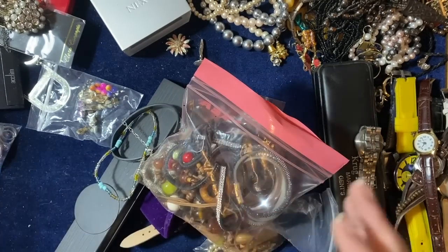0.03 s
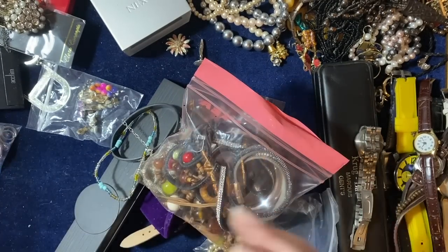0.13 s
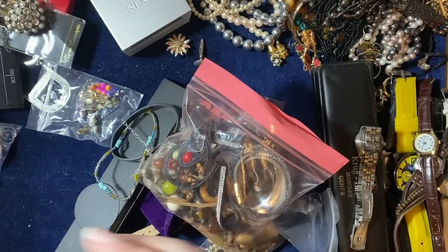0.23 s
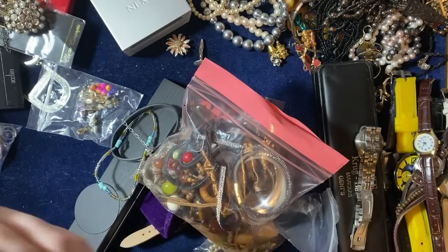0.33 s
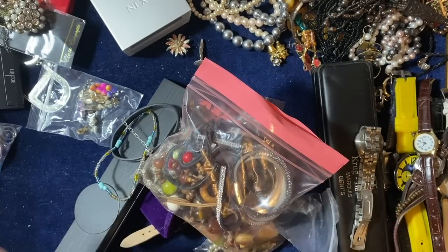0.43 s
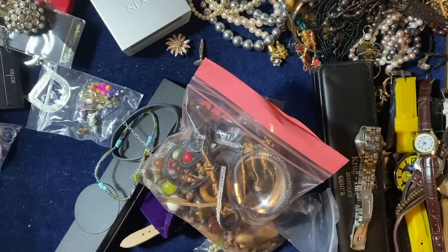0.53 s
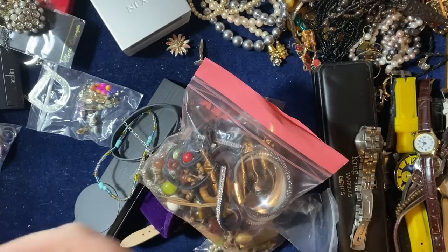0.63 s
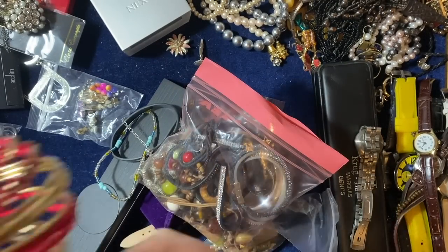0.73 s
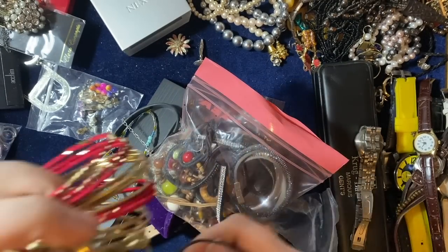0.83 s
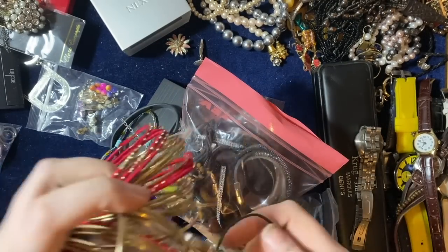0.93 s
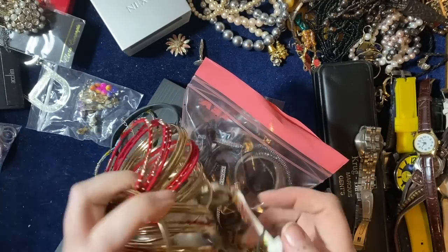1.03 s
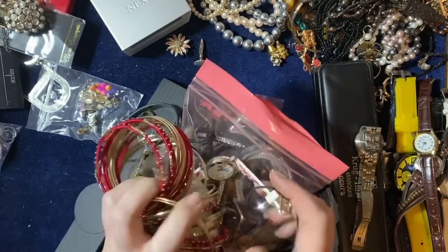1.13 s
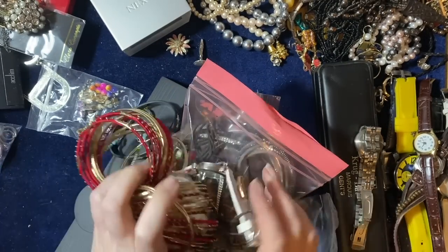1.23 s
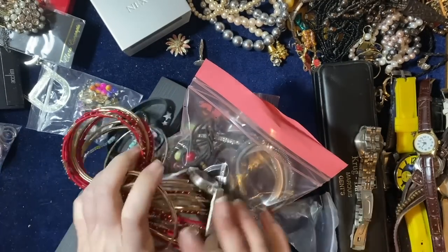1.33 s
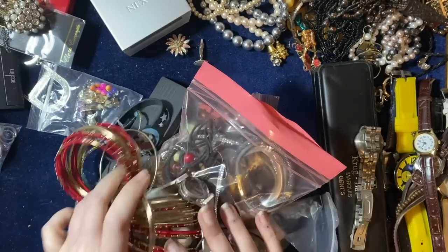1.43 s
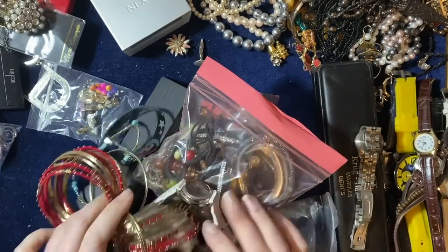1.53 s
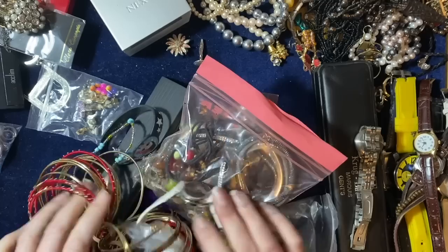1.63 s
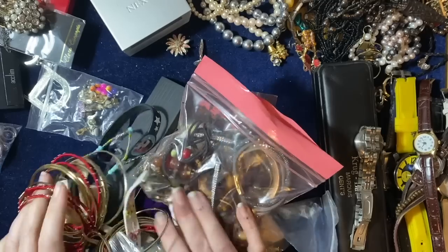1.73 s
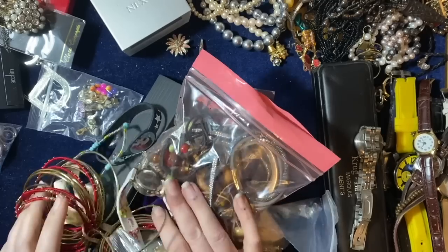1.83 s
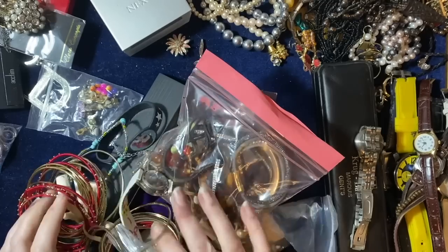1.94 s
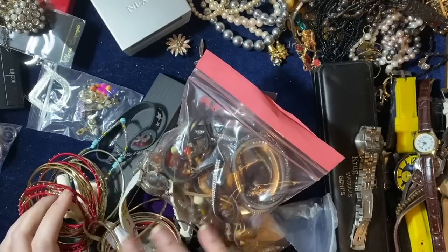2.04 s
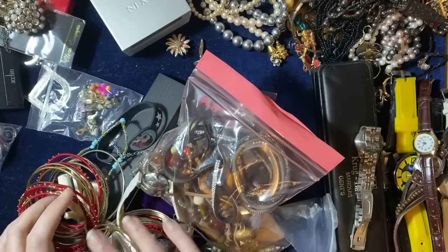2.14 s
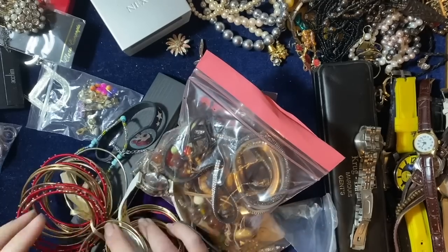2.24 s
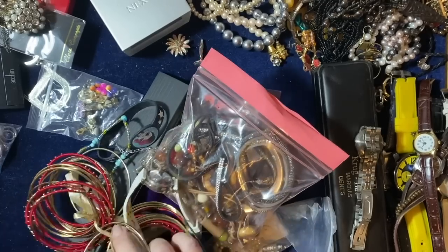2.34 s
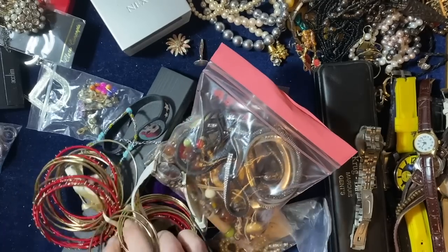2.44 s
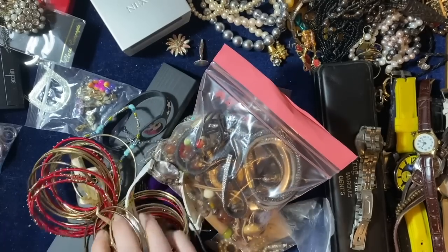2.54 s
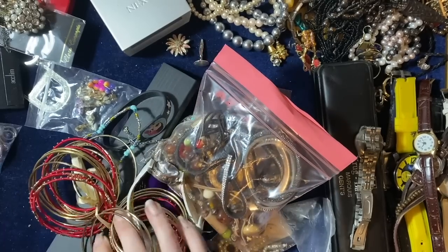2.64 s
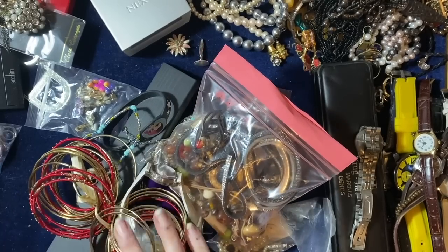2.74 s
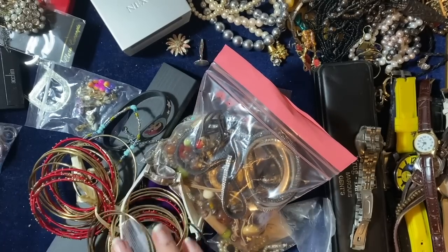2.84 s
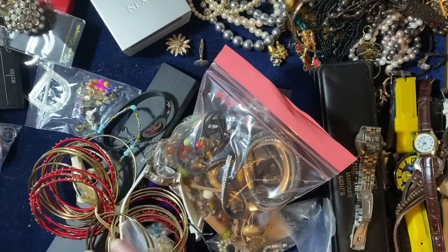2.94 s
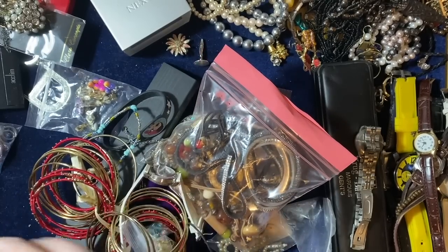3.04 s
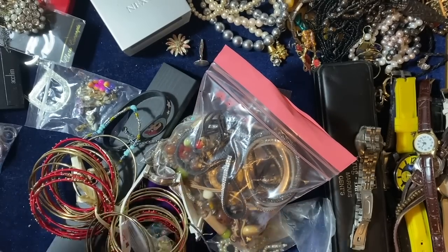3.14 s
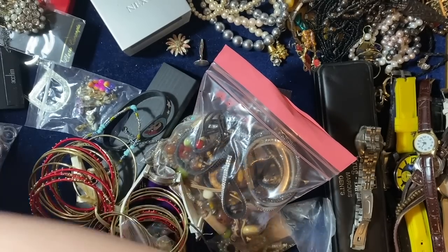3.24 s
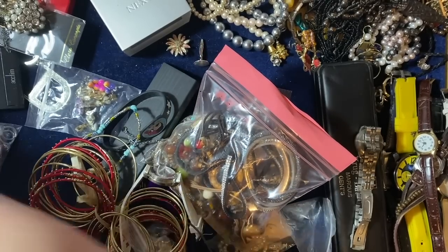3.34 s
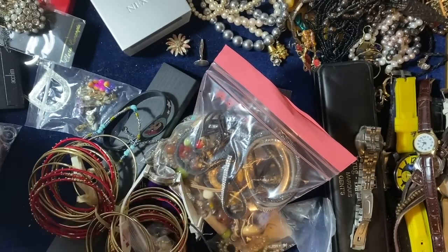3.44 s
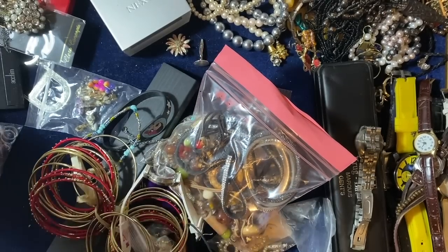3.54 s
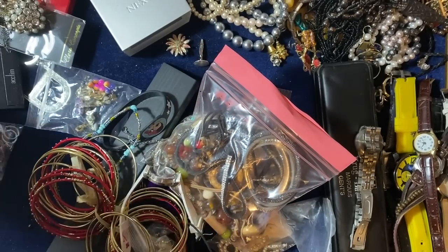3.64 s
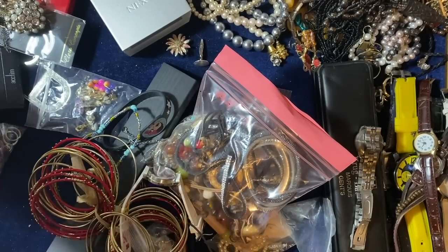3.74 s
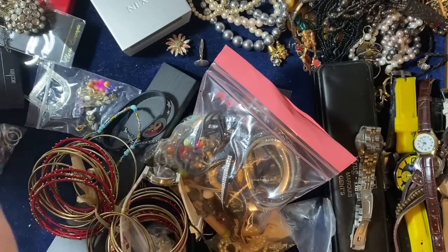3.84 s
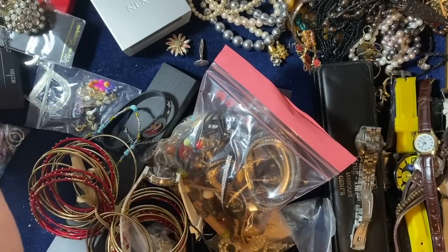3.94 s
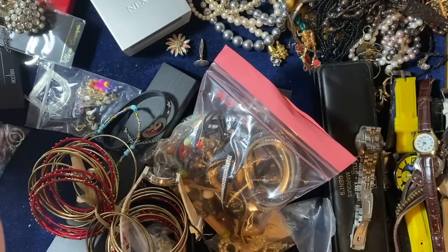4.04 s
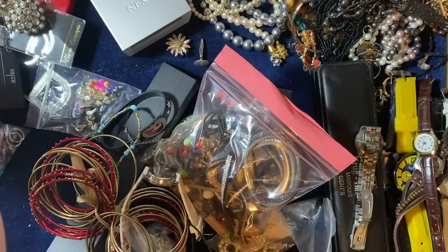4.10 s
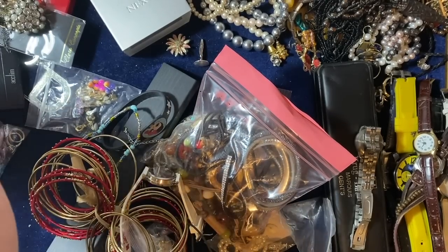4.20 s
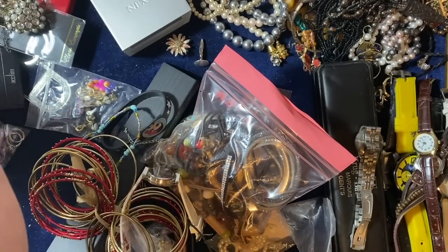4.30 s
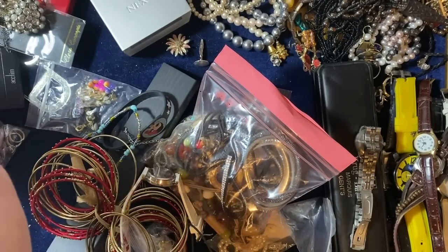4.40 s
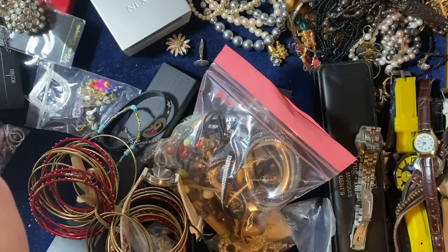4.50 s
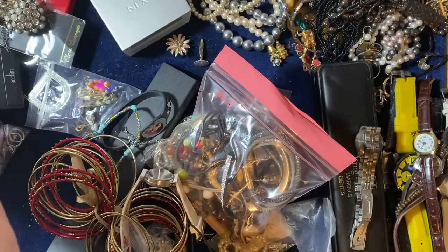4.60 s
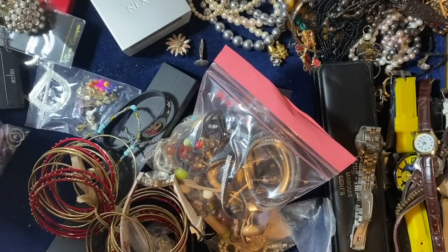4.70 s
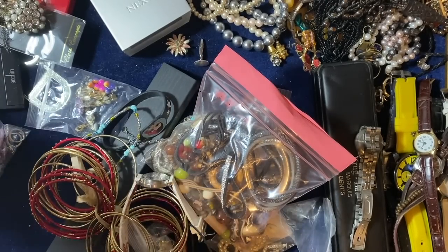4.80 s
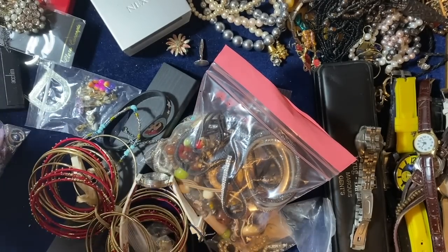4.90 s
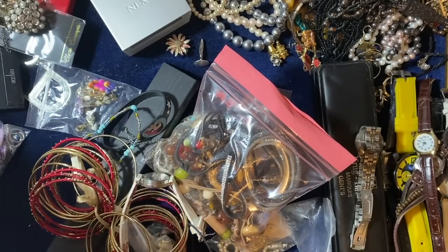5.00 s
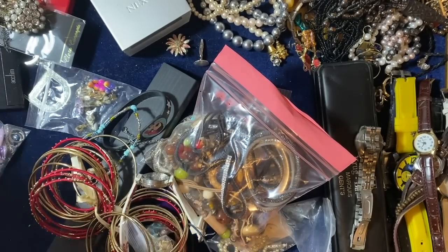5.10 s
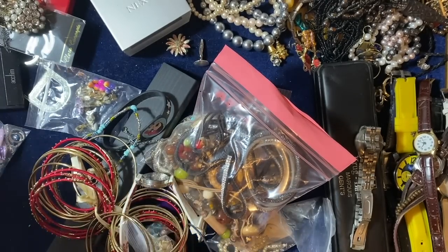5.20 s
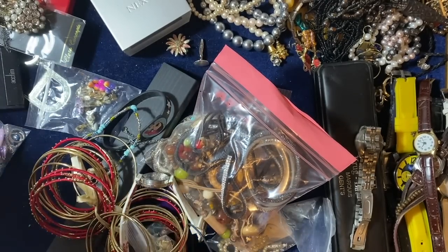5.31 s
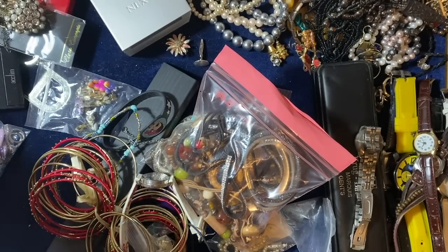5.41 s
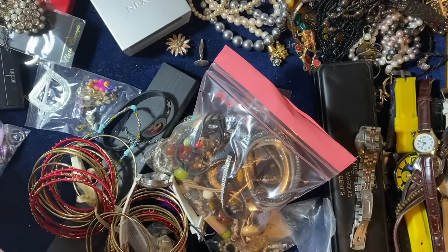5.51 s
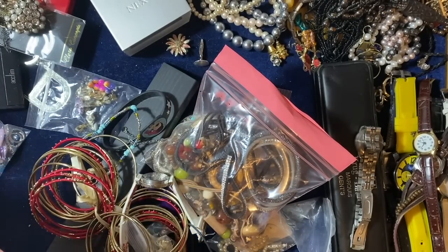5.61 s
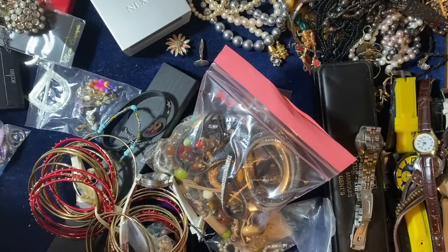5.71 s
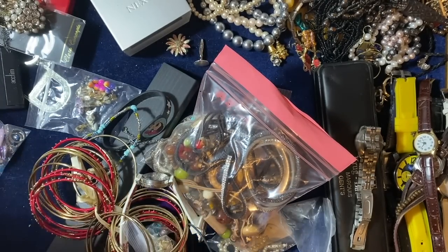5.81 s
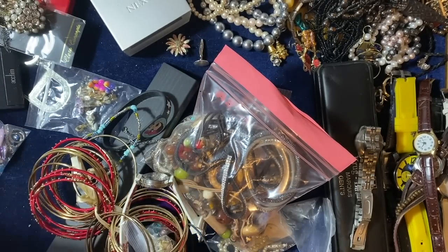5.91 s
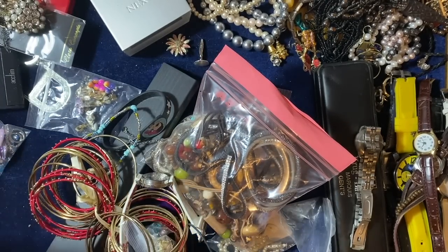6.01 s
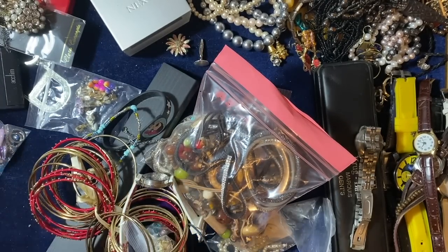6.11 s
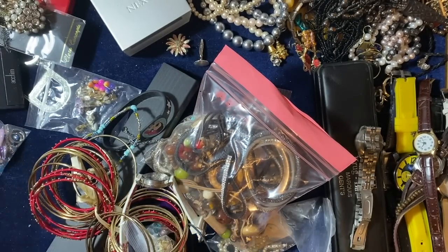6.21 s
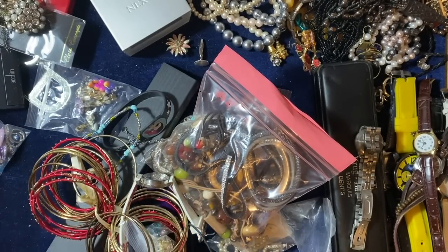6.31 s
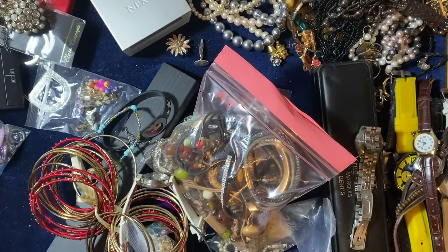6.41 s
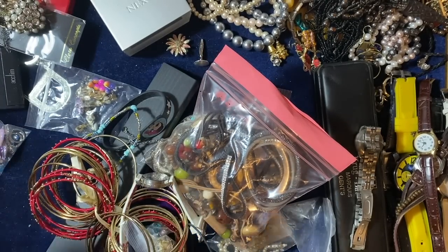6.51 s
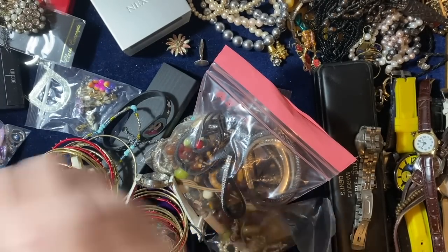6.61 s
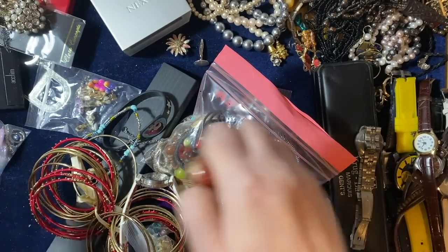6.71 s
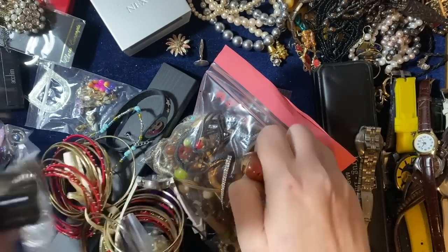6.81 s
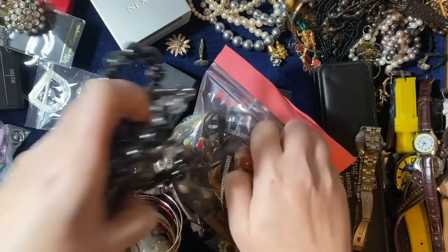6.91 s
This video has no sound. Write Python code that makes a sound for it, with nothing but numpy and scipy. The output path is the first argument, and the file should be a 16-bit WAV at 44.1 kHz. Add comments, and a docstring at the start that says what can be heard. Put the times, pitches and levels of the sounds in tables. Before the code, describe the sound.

Close up in a small quiet room, a hard knock and hollow box thump start things off with a burst of plastic crinkle. After a brief lull, thin metal bangles clatter and tick rapidly on a cloth-covered table. Rummaging softens into bag crackle, thuds and small clinks, nearly stops, then a sharp clack and rattle end it. Phone microphone, stereo, very dry.

```python
"""Plastic film crinkles in swarms of tiny snaps while bangles and jewellery tick, knock and clink, up close.
Hands set bangles down on a cloth-covered table and rummage in bags; a hollow box hums along.
Film is noise gated by random snaps, plus pitched crease pops; ticks are clicks and short noise rasps;
knocks, clinks and the box are decaying modes. A small quiet room with a faint noise floor surrounds it,
heard by a phone through two microphone ports."""
import sys
import numpy as np
from scipy import signal
from scipy.fft import rfft, irfft
from scipy.io import wavfile
from scipy.ndimage import uniform_filter1d

SR = 44100
rng = np.random.default_rng(int(sys.argv[2]) if len(sys.argv) > 2 else 0)


def transcribe(u):
    """Save the signal u as a 16-bit wav file named by the first command-line argument.

    u: samples, shape (n,) or (channels, n), limited to [-1, 1]; the rate is SR.
    q: integer samples, one column per channel.
    """
    v = np.clip(np.atleast_2d(u).T, -1, 1)
    q = np.round(v * 32767).astype(np.int16)
    wavfile.write(sys.argv[1], SR, q)


N = 306495
TIME = np.arange(N) / SR
HZ = np.maximum(np.arange(N // 2 + 1) * SR / N, 1.)

# modes of the table top and boxes: f/Hz, relative level/dB, t60/s
TABLE_MODES = [(113.3, -3, 0.092), (169, -7.5, 0.081), (221, 5, 0.023), (324, 3, 0.019), (520, 3, 0.013),
               (686, 6.5, 0.021), (795, 4.5, 0.017)]
# colour of the film's middle band: f/Hz, relative level/dB
CRINKLE_COLOUR = [(600, -23), (1000, -6.5), (1600, -6), (2150, -3.5), (2600, -5.5), (5000, -20.5)]
# colour of the film's upper-mid band: f/Hz, relative level/dB
CRISP_COLOUR = [(2000, 0), (3000, 5), (4000, 6.5), (5300, 6), (6300, 7.5), (8000, -33), (10000, -22.5)]
# colour of the film's treble and of bright snaps: f/Hz, relative level/dB
SIZZLE_COLOUR = [(5000, -24), (6500, -7), (9000, -1), (11500, 0), (14000, -2), (15800, -4)]
# hard pieces meeting: t/s, level before trims/dB, pitch f/Hz, bright snap re that level before trim/dB,
# rasp t60/s
TICKS = [(0.0483, -15, 2400, -8.5, 0.018), (0.128, -27, 1470, -7, 0.018), (0.133, -18, 1420, -25, 0.03),
         (0.157, -24, 1380, -16, 0.048), (0.202, -23, 1360, -41, 0.014), (0.211, -33, 1070, -28, 0.02),
         (0.2413, -14.5, 3380, -20, 0.027), (0.3484, -33, 1650, -28, 0.029), (0.362, -37, 2020, -8, 0.016),
         (0.3746, -33.5, 1560, -28, 0.027), (0.418, -39, 2020, -11, 0.022), (0.4746, -40, 2960, -6, 0.02),
         (0.508, -40.5, 5700, 3, 0.0067), (0.587, -44, 1780, -22, 0.01), (0.5962, -40, 2020, -16, 0.011),
         (0.5544, -28.5, 2540, -3, 0.0072), (0.6964, -31, 3930, -9.5, 0.018),
         (0.708, -28.5, 2400, -9, 0.016), (0.726, -35, 2420, -10, 0.032), (0.7634, -41, 2840, -20, 0.033),
         (0.8052, -50, 1780, -22, 0.047), (0.843, -30.5, 5760, -10, 0.0053),
         (0.855, -35, 5500, 0.5, 0.0062), (0.8841, -27, 2070, -15, 0.014), (0.897, -49, 2000, -5, 0.01),
         (0.9383, -45, 5000, -18, 0.016), (0.9532, -37, 2000, -27, 0.029), (0.972, -31, 1330, -24, 0.049),
         (0.985, -30, 1310, -15, 0.023), (1.018, -32.5, 5300, -6, 0.022), (1.071, -31.5, 4430, -6, 0.022),
         (1.1, -25.5, 2040, -21, 0.057), (1.1128, -12, 2000, -18, 0.023), (1.1192, -13, 3000, -11, 0.013),
         (1.188, -32, 2300, -23, 0.018), (1.2278, -23, 2060, -17, 0.019), (1.243, -28, 2050, -13, 0.028),
         (1.275, -27, 5230, -15, 0.017), (1.324, -29, 1770, -15, 0.024), (1.378, -43, 1960, -3, 0.016),
         (1.389, -30, 2460, -12, 0.016), (1.4093, -22.5, 895, -20, 0.034), (1.4552, -21.5, 2640, -29, 0.02),
         (1.492, -27, 1950, -25, 0.018), (1.545, -23, 1150, -30, 0.011), (1.555, -21, 2450, -25, 0.01),
         (1.573, -21.5, 2120, -13.5, 0.023), (1.5892, -26.5, 2130, -20, 0.018),
         (1.631, -35, 1610, -12, 0.043), (1.6504, -30, 2470, -20, 0.05), (1.68, -19, 3500, -18, 0.036),
         (1.7, -28, 900, -13, 0.016), (1.722, -39, 2130, -17, 0.011), (1.735, -26, 2140, -13, 0.019),
         (1.7654, -23, 910, -14, 0.023), (1.787, -23.5, 1430, -7, 0.014), (1.872, -31, 4030, -21, 0.057),
         (1.9096, -27.5, 2540, -19, 0.035), (2.1026, -38, 1710, -18, 0.052),
         (2.1298, -27.5, 2650, -17, 0.037), (2.2004, -29, 2160, -13, 0.053), (2.3308, -32, 2240, -5, 0.013),
         (2.3448, -22, 2090, -11, 0.0078), (2.362, -32, 2090, -11, 0.018),
         (2.4897, -21.5, 2500, -26, 0.039), (2.508, -23, 1230, -24, 0.031), (2.5968, -19, 2050, -21, 0.018),
         (2.633, -38, 2200, -18, 0.0088), (2.6675, -32, 1790, -16, 0.011),
         (2.6776, -33, 2180, -15.5, 0.048), (2.7766, -34.5, 5900, -12, 0.028),
         (2.8353, -17, 4450, 2, 0.0074), (2.957, -26, 3170, -10, 0.033), (2.9771, -21, 3800, -14, 0.033),
         (3.122, -29.5, 2000, -8, 0.025), (3.154, -30, 1520, -32, 0.011), (3.282, -30.5, 1830, -13, 0.027),
         (3.364, -22.5, 1780, -5, 0.011), (3.399, -22, 2880, -30, 0.0073), (3.41, -25, 1840, -32, 0.01),
         (3.476, -32, 2460, -20, 0.017), (3.508, -24.5, 3930, -6, 0.027), (3.52, -39, 4500, -14, 0.021),
         (3.539, -24, 1090, -28, 0.033), (3.633, -30, 4020, -4, 0.027), (3.719, -37, 930, -22, 0.01),
         (3.8741, -26, 910, -5.5, 0.035), (3.956, -28, 1350, -35, 0.031), (4.0193, -31, 1380, -30, 0.0058),
         (4.2383, -33, 1030, -11, 0.015), (4.361, -33, 2870, -9, 0.017), (4.389, -30, 2160, -6, 0.023),
         (4.451, -30, 5900, -17, 0.029), (4.5478, -29, 2180, -28, 0.023), (4.579, -30, 2470, -9, 0.013),
         (4.617, -26, 1380, -20, 0.018), (4.6309, -25.5, 1900, -16, 0.019), (4.7006, -32, 2160, -9, 0.028),
         (4.725, -36.5, 2890, -9, 0.033), (4.754, -37, 2150, -17, 0.02), (4.791, -39, 2940, -22, 0.025),
         (4.853, -41.5, 2280, -29, 0.06), (4.9436, -41.5, 3820, -10, 0.031),
         (5.012, -42.5, 2930, -15, 0.054), (5.1772, -31.5, 2330, -17, 0.044),
         (5.228, -37, 2250, -25, 0.047), (5.324, -46, 3300, -15, 0.015), (5.3804, -33, 2200, -40, 0.016),
         (5.4733, -47.5, 2270, 2, 0.02), (5.524, -40, 2050, -13, 0.015), (5.545, -37, 3500, -30, 0.026),
         (5.57, -42, 3700, -20, 0.02), (5.614, -23.5, 3950, -15, 0.0068), (5.7897, -35, 2010, -13, 0.035),
         (5.8626, -49, 2210, -20, 0.02), (5.9046, -39, 2000, -15, 0.038), (6.208, -45, 2000, -20, 0.028),
         (6.2165, -39, 2950, -20, 0.023), (6.285, -41.5, 2670, -10, 0.038), (6.357, -42, 2760, -29, 0.015),
         (6.392, -40, 2750, -3.5, 0.022), (6.474, -45, 3490, -17, 0.024), (6.4929, -38, 2780, -13, 0.017),
         (6.549, -39, 3200, -18, 0.034), (6.584, -44, 2700, -12, 0.019), (6.6732, -42, 3020, -16, 0.036),
         (6.697, -41, 3300, -12, 0.036), (6.7475, -19.5, 4100, -9, 0.044), (6.76, -21, 5370, -9, 0.027),
         (6.7886, -30, 5130, -11, 0.052), (6.835, -29, 3600, -27, 0.04), (6.8497, -15, 2030, -14.5, 0.029),
         (6.873, -22, 1190, -24, 0.03), (6.9313, -29.5, 2280, -15, 0.032)]
# knocks on the table: t/s, level before trim/dB, pitch f/Hz
KNOCKS = [(0.052, -26.5, 293), (0.062, -28, 125), (0.1326, -20, 226), (0.14, -12, 535), (0.1555, -4, 508),
          (0.1572, -8.5, 1890), (0.163, -14, 238), (0.21, -16, 830), (0.239, -16.5, 750), (0.368, -32, 770),
          (1.108, -19, 860), (1.144, -28, 835), (1.168, -31.5, 114), (1.249, -34, 105), (1.391, -31, 116),
          (1.409, -18, 720), (1.429, -32, 760), (1.446, -28, 780), (1.4568, -15, 850), (1.476, -30, 99),
          (1.483, -24, 880), (1.492, -27, 744), (1.505, -23.5, 790), (1.525, -23, 845), (1.544, -18.5, 784),
          (1.556, -21, 820), (1.56, -27.5, 109), (1.65, -22, 587), (1.677, -30, 149), (1.688, -28, 467),
          (1.721, -32, 950), (1.712, -48, 193), (1.789, -25, 780), (2.132, -38, 143), (2.153, -32.5, 384),
          (2.219, -28, 120), (2.4891, -16.5, 700), (2.503, -24.5, 394), (2.5965, -21, 696),
          (2.608, -28.5, 111), (2.838, -34, 218), (2.973, -26, 251), (3.1, -31, 319), (3.274, -32, 358),
          (3.339, -22.5, 288), (3.365, -24.5, 517), (3.479, -24.5, 111), (3.517, -28, 153),
          (3.544, -34, 94.5), (3.636, -28.5, 221), (3.698, -28.5, 108), (3.726, -22, 900),
          (3.875, -22, 186), (3.956, -20, 363), (4.078, -22, 1080), (4.28, -21.5, 218), (4.39, -32, 117),
          (4.452, -19, 531), (4.625, -24, 510), (4.644, -22.5, 196.5), (4.744, -37, 201), (5.058, -39, 106),
          (5.097, -31.5, 1580), (5.098, -35, 850), (5.148, -30.5, 210), (5.611, -36, 239),
          (6.097, -35.5, 233), (6.313, -37.5, 128), (6.76, -29.5, 112), (6.848, -20.5, 427),
          (6.873, -26.5, 104), (6.903, -21.5, 720)]


def undb(db):
    """Gain of a dB value."""
    return 10 ** (np.asarray(db) / 20)


def unit(x):
    """Scale to rms 1."""
    return x / np.sqrt(np.mean(x ** 2))


def over_hz(points):
    """Read (f/Hz, value) points on a log frequency axis."""
    hz, value = np.transpose(points)
    return np.interp(np.log(HZ), np.log(np.maximum(hz, 1)), value)


def colour(x, points):
    """Shape by (f/Hz, dB) points to rms 1: -80 dB an octave below the first, the last level held above."""
    floor = (points[0][0] / 2, -80)
    gain = undb(over_hz([floor] + list(points)))
    return unit(irfft(rfft(x) * gain, N))


def fade(t60, length):
    """Exponential decay, 60 dB in t60 seconds."""
    return np.exp(-np.log(1000) * np.arange(length) / SR / t60)


def ring(x, modes):
    """Pass through decaying resonances (f/Hz, dB, t60/s), partly evened out for their sharpness."""
    out = 0
    for hz, db, t60 in modes:
        pole = np.exp(2j * np.pi * hz / SR - np.log(1000) / (t60 * SR))
        resonance = signal.lfilter([1], [1, -pole], x).imag
        out = out + undb(db) * np.sqrt(1 - abs(pole)) * resonance
    return out


def add(out, s, x):
    """Mix x in from time s."""
    i = int(s * SR)
    out[i:i + len(x)] += x[:N - i]


def settling(events, t60, rise_s):
    """Envelope that rises at each (t/s, dB) event and decays, cut after 1 s; powers add."""
    power = np.zeros(N)
    shape = (fade(t60, SR) * (1 - np.exp(-TIME[:SR] / rise_s))) ** 2
    for s, db, *_ in events:
        add(power, s, undb(2 * db) * shape)
    return np.sqrt(power)


def random_hits(per_s, scatter_db, spread):
    """Impulses at random times; their dB sizes are exponentially scattered, spread below 1 caps them."""
    chance, size = rng.random((N, 2)).T
    return (chance < per_s / SR) * undb(-scatter_db * np.log(1 - spread * size))


def swarm(per_s, scatter_db, t60, bed):
    """Envelope of random snaps of very uneven size over a steady bed; rms 1."""
    hits = random_hits(per_s, scatter_db, .97)
    tails = signal.lfilter([1], [1, -np.exp(-np.log(1000) / (t60 * SR))], hits)
    softened = uniform_filter1d(tails, size=int(.003 * SR))  # 3 ms rounds the onsets
    return unit(bed + unit(softened))


def creases(lo_hz, hi_hz, per_s, scatter_db, cycles, count=7):
    """Each crease pops at its own pitch, falling 60 dB in the given number of cycles."""
    out = 0
    for hz in np.geomspace(lo_hz, hi_hz, count):
        pops = random_hits(per_s, scatter_db, .995)
        out = out + unit(ring(pops, [(hz, 0, cycles / hz)]))
    return unit(out)


def air():
    """Room tone and microphone hiss, with the box humming steadily near 524 Hz: steady coloured noise."""
    # colour of the noise floor, the box's steady hum peaking near 524 Hz: f/Hz, relative level/dB
    floor_colour = [(30, 8), (158, 69), (429, 26), (524, 60), (585, 33), (1140, -100), (2120, -69),
                    (6000, -2), (7800, -48), (16000, -50)]
    return undb(-75) * colour(rng.standard_normal(N), floor_colour)


def box():
    """Loose contents bump the walls after each jolt; the walls hum on, wavering a little in pitch."""
    # modes of the hollow box: f/Hz, relative level/dB, t60 of the bumped sound/s
    walls = [(496, -4, 0.13), (524.6, -1, 1), (714, -13, .1)]
    # jolts of the box: t/s, level before trims/dB
    jolts = [(0.157, -22), (2.968, -26), (3.075, -26.5), (3.364, -39), (3.549, -24.5), (3.72, -47),
             (3.875, -24), (4.3, -35.5), (4.45, -26.5), (4.601, -26.5), (5.024, -32), (5.322, -30.5),
             (5.564, -41)]
    jolt_rise_s, jolt_t60_s = .012, .18
    linger_db, linger_t60_s = -21, 1.93
    waver_hz = 8.9  # rms

    bumps = swarm(per_s=25.0, scatter_db=2.0, t60=0.19, bed=0.8)
    bumped = undb(-5.5) * unit(ring(bumps * rng.standard_normal(N), walls))
    hum = 0
    for hz, db, _ in walls:
        waver = unit(uniform_filter1d(rng.standard_normal(N), size=SR // 60))
        phase = 2 * np.pi * np.cumsum(hz + waver_hz * waver) / SR
        hum = hum + undb(db) * np.sin(phase)
    jolted = settling(jolts, jolt_t60_s, jolt_rise_s) * bumped
    lingering = undb(linger_db) * settling(jolts, linger_t60_s, jolt_rise_s) * hum
    return jolted + lingering


def clinks():
    """Small solid metal pieces ring on one pure decaying line each."""
    # clinks: t/s, f/Hz, level/dB, t60/s
    lines = [(0.157, 1325, -18, 0.084), (0.16, 1010, -25, 0.07), (1.411, 650, -47, 0.12),
             (3.237, 2520, -40, 0.075), (2.695, 14940, -39, 0.11), (2.695, 11900, -50, 0.085),
             (2.695, 11000, -44, 0.054), (3.875, 7730, -15, 0.013), (4.41, 7820, -17, 0.0095),
             (4.59, 11170, -35.5, 0.23)]
    out = np.zeros(N)
    length = SR // 3
    for s, hz, db, t60 in lines:
        add(out, s, undb(db) * fade(t60, length) * np.sin(2 * np.pi * hz * TIME[:length]))
    return out


def knocks():
    """Each knock sounds at its own pitch and rings the table modes, the nearer ones louder."""
    out = np.zeros(N)
    mode_hz, mode_db, mode_t60 = np.transpose(TABLE_MODES)
    chance = rng.standard_normal((len(KNOCKS), 2, len(TABLE_MODES)))
    t = np.arange(6000) / SR
    for (s, db, knock_hz), (size, tune) in zip(KNOCKS, chance):
        octaves_away = abs(np.log2(mode_hz / knock_hz))
        near_db = mode_db + 4.6 * size - 8.8 * octaves_away
        hz = np.append(mode_hz * (1 + 0.059 * tune), knock_hz)
        gain = np.append(undb(near_db - 3.0), 1)
        t60 = np.append(mode_t60, min(28 / knock_hz, .1))  # higher knocks die sooner
        decay = np.exp(-np.log(1000) * t / t60[:, None])
        # soft contact through cloth: lower knocks swell more slowly
        contact = 1 - np.exp(-t * knock_hz / 1.1)
        knock = gain @ (np.sin(2 * np.pi * hz[:, None] * t) * decay) * contact
        add(out, s, undb(db - 6.0) * knock / abs(knock).max())
    return out


def ticks():
    """Hard pieces meet: a sharp click, a short pitched rasp and a bright snap; film snaps join the treble."""
    # film snaps, treble only: t/s, level before trim/dB
    film_snaps = [(1.366, -20), (1.665, -14), (2.9576, -32), (3.487, -19), (4.1682, -24), (4.272, -25),
                  (4.4701, -14.5), (4.567, -21), (4.5887, -11.5), (5.228, -23), (5.646, -29)]
    click_db, click_s, rasp_rise_s = 4.0, 0.00006, 0.0012  # click gain ahead of scaling, width, swell

    out, snap_env = np.zeros((2, N))
    t = np.arange(4000) / SR
    wide = colour(rng.standard_normal(N), CRINKLE_COLOUR[2:-1] + CRISP_COLOUR[2:])
    click = np.gradient(np.exp(-((t - rasp_rise_s) / click_s) ** 2))
    click = click / click.max()
    for s, db, hz, snap_db, t60 in TICKS:
        decay = fade(t60, len(t)) + 0.45 * fade(0.004, len(t))
        burst = decay * (1 - np.exp(-t / rasp_rise_s))
        rasp = burst * np.resize(wide[int(s * SR):], len(t))
        rough = rasp + undb(click_db) * click
        pitched = ring(rough, [(hz, 0, 18 / hz)])  # 60 dB down in 18 cycles
        tick = undb(-2.0) * rough / abs(rough).max() + undb(-4.0) * pitched / abs(pitched).max()
        add(out, s - rasp_rise_s, undb(db) * tick)
        add(snap_env, s - rasp_rise_s, undb(db + snap_db + 11.0) * burst ** 1.37)
    for s, db in film_snaps:
        add(snap_env, s, undb(db - 9.0) * fade(0.013, len(t)))
    return out + snap_env * colour(rng.standard_normal(N), SIZZLE_COLOUR)


def handling_levels(film_db, treble_db, weight_db):
    """Film and table gains: hand curves plus film straining around ticks and the pile settling after knocks."""
    film_strains_s, film_settles_s = 0.0017, 0.11  # rise time constant, t60
    rustle_db, rustle_db_per_s = -33, 532  # film re its tick; longer ticks drag more film along
    pile_db, pile_t60_s, pile_rise_s = -9, 0.12, 0.0024  # after low knocks, level re the knock's
    bangles_db, bangles_t60_s, bangles_rise_s = -19, 0.2, 0.0095  # bangles rattle after high knocks
    hollow_hz = 450  # parts low knocks from high
    crisp_follows_treble, rattle_follows_film = 0.69, 0.6  # shares

    mid_events, treble_events = [], []
    for s, db, _, snap_db, t60 in TICKS:
        start = s - film_strains_s  # film strains up to the tick
        level = db + rustle_db + rustle_db_per_s * t60
        mid_events.append((start, level))
        treble_events.append((start, level + snap_db))
    after_tick = settling(mid_events, film_settles_s, film_strains_s)
    after_snap = settling(treble_events, film_settles_s, film_strains_s)
    low_knocks = [k for k in KNOCKS if k[2] < hollow_hz]
    high_knocks = [k for k in KNOCKS if k[2] >= hollow_hz]
    pile = undb(pile_db) * settling(low_knocks, pile_t60_s, pile_rise_s)
    bangles = undb(bangles_db) * settling(high_knocks, bangles_t60_s, bangles_rise_s)

    mid = np.hypot(undb(film_db), after_tick)
    treble = np.hypot(undb(treble_db), after_snap)
    rub = np.hypot(undb(weight_db), pile)
    crinkle = undb(0.1) * mid
    crisp = undb(5.5) * treble ** crisp_follows_treble * mid ** (1 - crisp_follows_treble)
    sizzle = undb(9) * treble
    rattle = undb(-3) * mid ** rattle_follows_film * rub ** (1 - rattle_follows_film)
    return crinkle, crisp, sizzle, rub, np.hypot(rattle, bangles)


def handling():
    """Swarms of snaps light up all film bands at once, creases pop alone; slower bumps reach the table."""
    # rummaging, one curve per handful, levels before trims:
    # t/s, film level/dB, film treble level/dB, weight on the table level/dB
    handfuls = [
        [(0, -47, -61, -38), (.11, -54, -58.5, -45.5), (.15, -33.5, -75, -34), (.29, -44.5, -67, -48.5),
         (.52, -72.5, -81, -64), (.68, -70, -79, -62), (.71, -61, -52, -62), (.82, -100, -99, -62.5),
         (.93, -63.5, -74, -68)],
        [(.99, -43.5, -69, -52.5), (1.08, -57.5, -51.5, -62), (1.13, -34, -51.5, -52.5), (1.31, -50, -59, -50),
         (1.49, -39, -57, -45), (1.62, -50, -62.5, -50), (1.69, -36, -49.5, -37), (1.78, -41, -61.5, -46.5),
         (1.93, -53, -61.5, -51), (2.05, -63.5, -87, -71)],
        [(2.13, -48.5, -53.5, -55), (2.22, -51, -58, -49), (2.3, -51, -57.5, -52), (2.38, -43, -71, -44.5),
         (2.47, -53.5, -68, -49.5), (2.52, -49, -67, -49), (2.81, -55.5, -69, -53.5)],
        [(2.86, -45.5, -57, -47), (3.0, -45, -54.5, -41.5), (3.25, -43.5, -63, -44), (3.42, -43, -59, -46.5),
         (3.52, -40.5, -61, -34), (3.6, -51, -59, -40.5), (3.85, -54.5, -72, -54)],
        [(3.89, -47, -48, -44), (3.99, -47, -72, -38), (4.22, -55, -68, -54), (4.3, -49.5, -62.5, -47),
         (4.45, -49, -48.5, -38), (4.53, -51, -60.5, -42.5), (4.63, -43.5, -55.5, -41),
         (4.92, -62.5, -68, -55.5)],
        [(5.21, -59.5, -62, -49), (5.42, -57.5, -74.5, -57), (5.62, -53, -65, -52), (5.68, -61, -70, -53),
         (5.92, -56.5, -63, -59), (5.98, -59.5, -67, -61), (6.44, -70, -79, -61.5), (6.72, -74.5, -74, -61)],
        [(6.76, -31, -64, -29), (6.82, -80, -56, -51), (6.87, -40.5, -46, -48), (6.95, -53, -65, -55)],
    ]
    # one value per handful: crackle/share, 0 a smooth rub, 1 all snaps
    crackle_shares = [0.76, 0.98, 1, 0.52, 0.72, 0.61, 0.77]

    s, *levels = np.concatenate(handfuls).T
    curves = [np.interp(TIME, s, db) for db in levels]
    crinkle, crisp, sizzle, rub, rattle = handling_levels(*curves)

    snaps = swarm(per_s=340., scatter_db=7.0, t60=0.02, bed=0.45)
    crackle = np.interp(TIME, s, np.repeat(crackle_shares, [len(h) for h in handfuls]))
    snaps = crackle * snaps + 1 - crackle
    bumps = swarm(per_s=88.0, scatter_db=5.5, t60=0.054, bed=0.85)
    dull_noise, treble_noise, low_noise, high_noise, bright_noise = rng.standard_normal((5, N))

    dull_pops = creases(900.0, 3200.0, per_s=110.0, scatter_db=3.0, cycles=40.0)
    bright_pops = creases(2900.0, 6000.0, per_s=200.0, scatter_db=3.0, cycles=30.0)
    dull = snaps * dull_noise + undb(-11.0) * dull_pops
    bright = snaps * bright_noise + undb(-12.0) * bright_pops
    film = crinkle * colour(dull, CRINKLE_COLOUR)
    film += crisp * colour(bright, CRISP_COLOUR)
    film += sizzle * colour(snaps * treble_noise, SIZZLE_COLOUR)

    low_modes = [mode for mode in TABLE_MODES if mode[0] < 400]
    high_modes = [mode for mode in TABLE_MODES if mode[0] > 400]
    body = rub * unit(ring(bumps * low_noise, low_modes))
    body += rattle * unit(ring((bumps + snaps) * high_noise, high_modes))
    return film + body


def ports(dry):
    """Both ports share the near sound and an echo, shifted in phase; sideways echo pushes them opposite ways."""
    # phase between the ports: f/Hz, left port's lead/rad
    port_phase = [(0, 0), (780, -.5), (2330, .5), (4390, .7), (5250, .4), (6700, 3.1), (8250, 3.25),
                  (9730, 6.2), (11100, 6.4), (12700, 9.35), (14400, 9.5), (15800, 12.6)]
    # balance of the ports: f/Hz, left minus right level/dB
    port_balance = [(100, 0), (300, -1.5), (600, -3), (1200, -2), (2500, -1.2), (5000, 0), (16000, .3)]
    # sideways echo: f/Hz, level/dB
    port_apart = [(60, -30), (150, -25), (300, -12), (700, -6.5), (3000, -8), (6000, -10), (16000, -10)]
    room_t60_s, room_db = .13, -20

    length = SR // 2
    tails = rng.standard_normal((2, length)) * fade(room_t60_s, length)
    tails[:, :130] = 0  # first reflection needs 3 ms
    tails = tails / np.sqrt(np.sum(tails ** 2, axis=1, keepdims=True))
    shared, sideways = rfft(tails, N)
    near = 1 + undb(room_db) * shared
    apart = undb(over_hz(port_apart)) * sideways
    hz, lead = np.transpose(port_phase)
    # each port takes half of the balance and half of the lead
    half = undb(over_hz(port_balance) / 2) * np.exp(.5j * np.interp(HZ, hz, lead))
    left, right = (near + apart) * half, (near - apart) / half
    return irfft(rfft(dry) * np.array([left, right]), N)


def scene():
    """All sources, heard through the two ports."""
    return ports(air() + box() + clinks() + knocks() + ticks() + handling())


def record(dry):
    """The phone drops the deepest bass below 52 Hz and cuts the top above 15.9 kHz."""
    firm = signal.sosfilt(signal.butter(4, 52., "high", fs=SR, output="sos"), dry)
    return signal.sosfilt(signal.ellip(8, .2, 70, 15900, fs=SR, output="sos"), firm)


dry = scene()
out = record(dry)
transcribe(out)
```